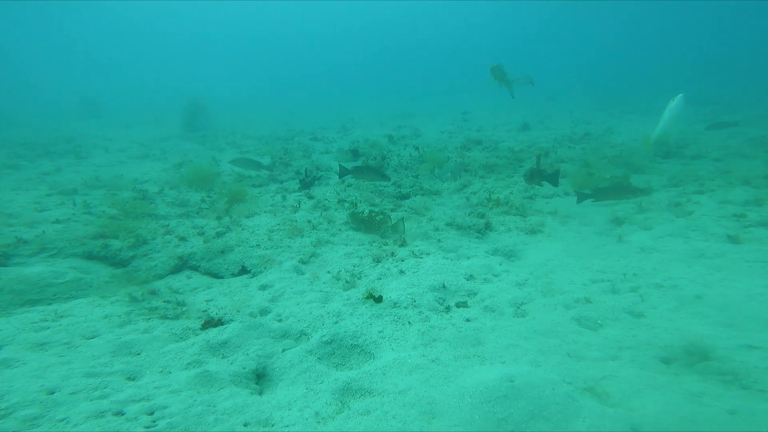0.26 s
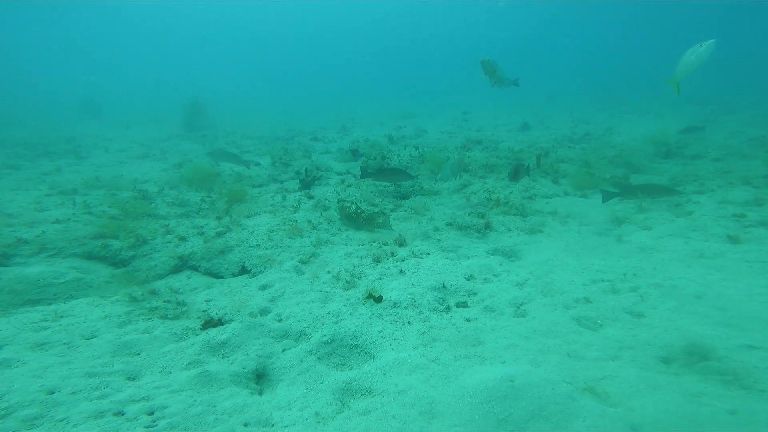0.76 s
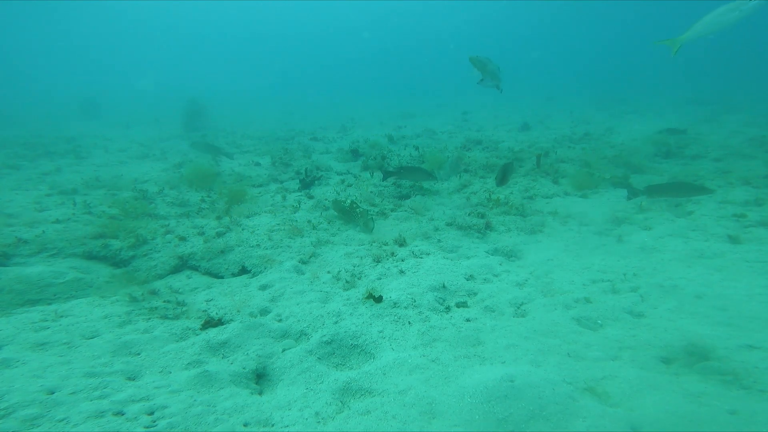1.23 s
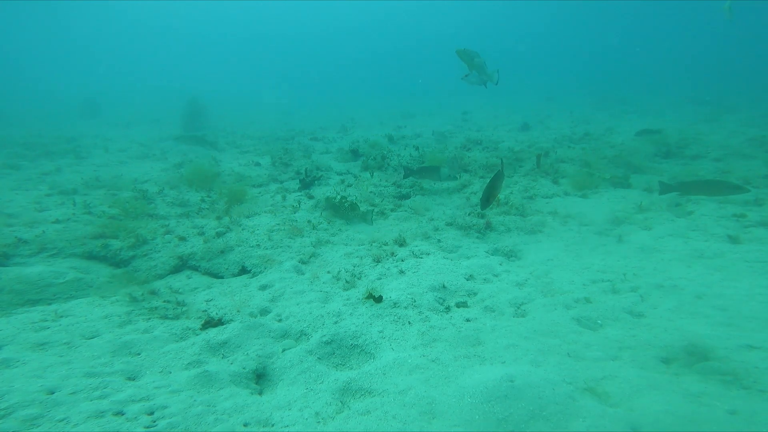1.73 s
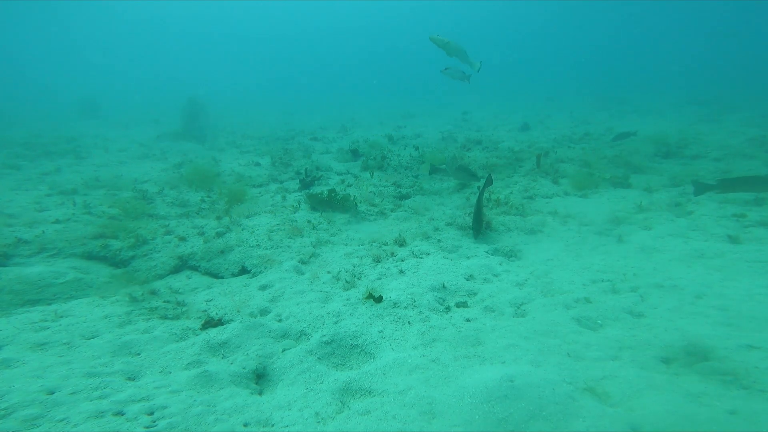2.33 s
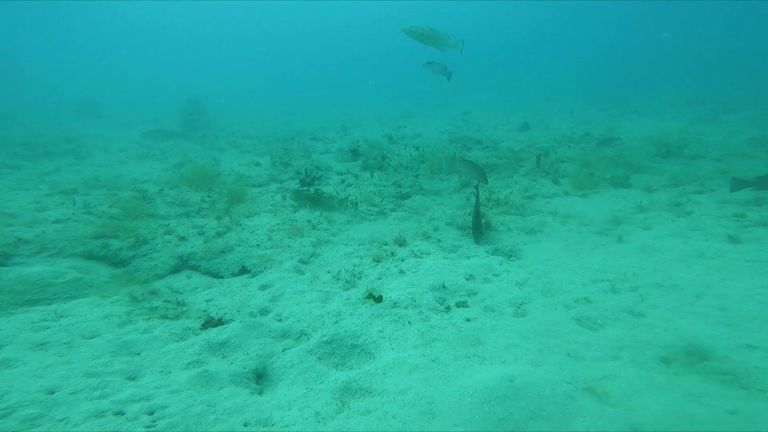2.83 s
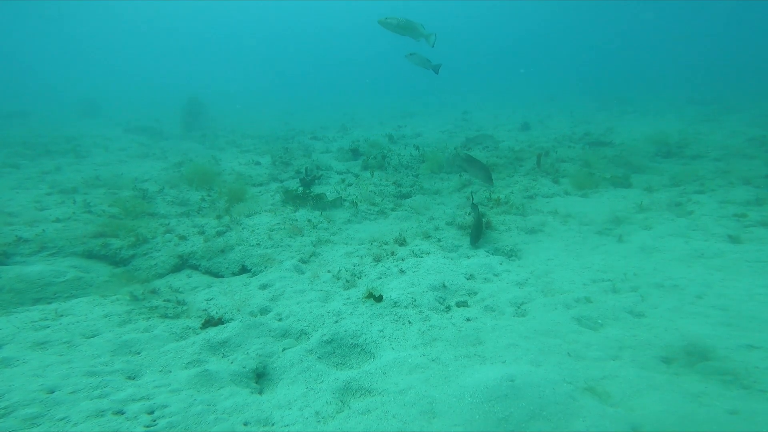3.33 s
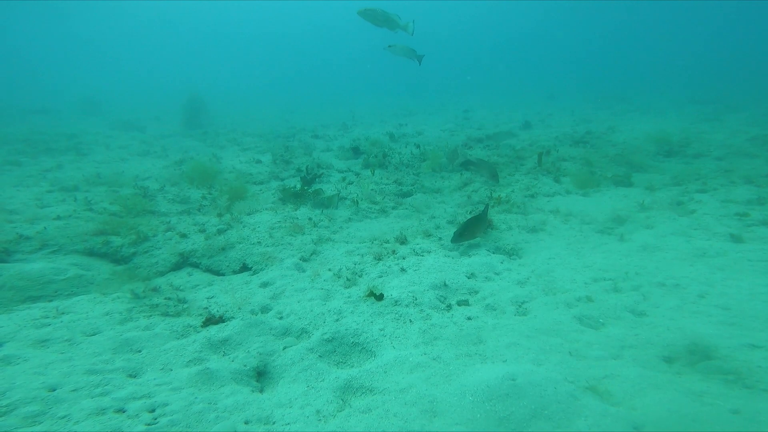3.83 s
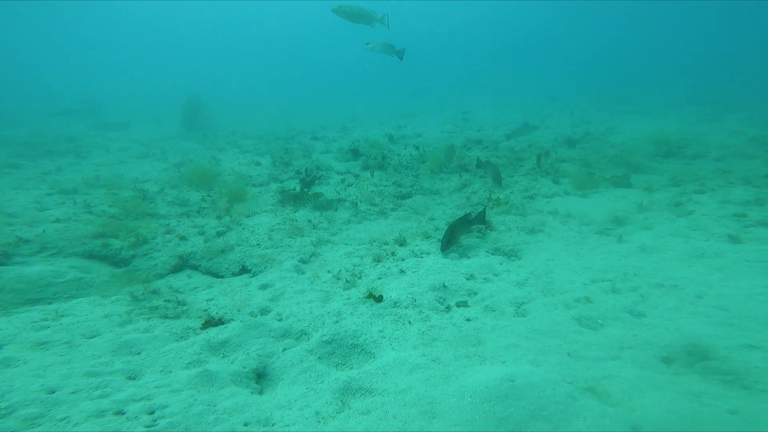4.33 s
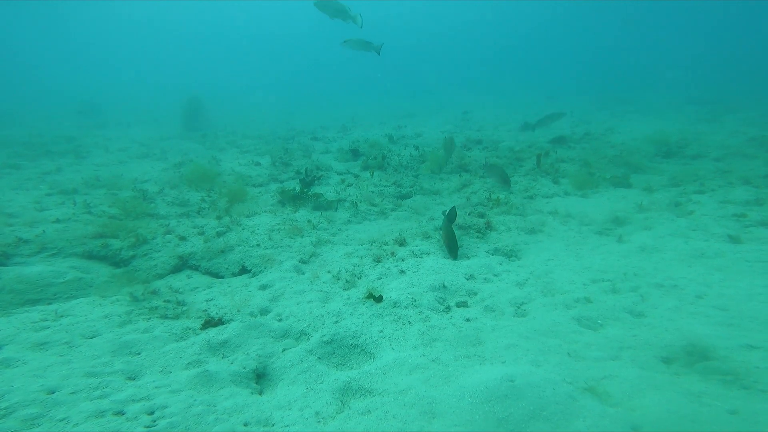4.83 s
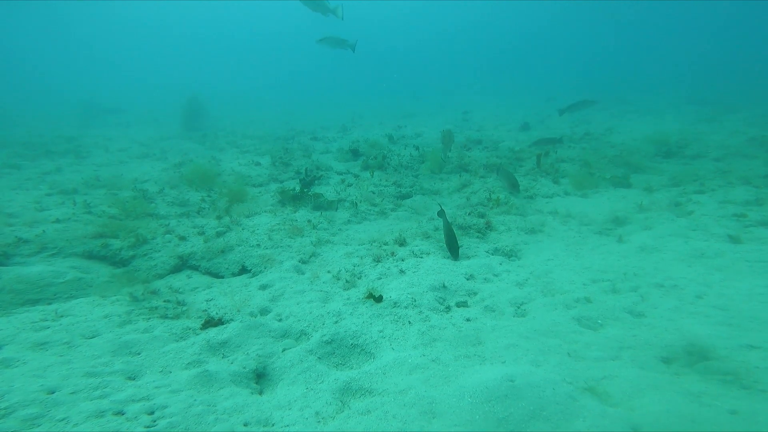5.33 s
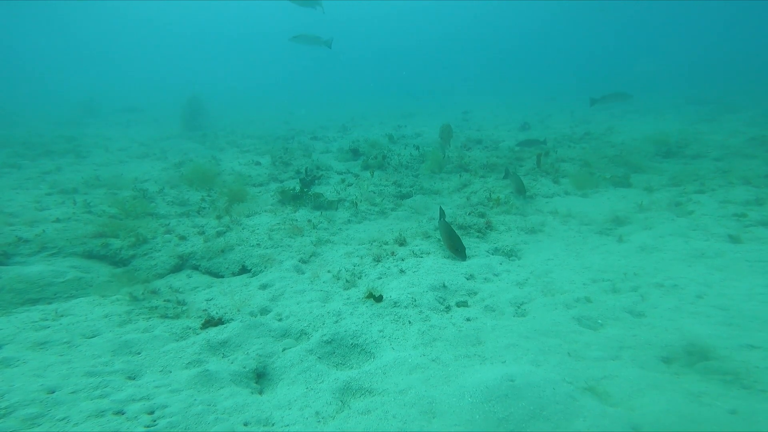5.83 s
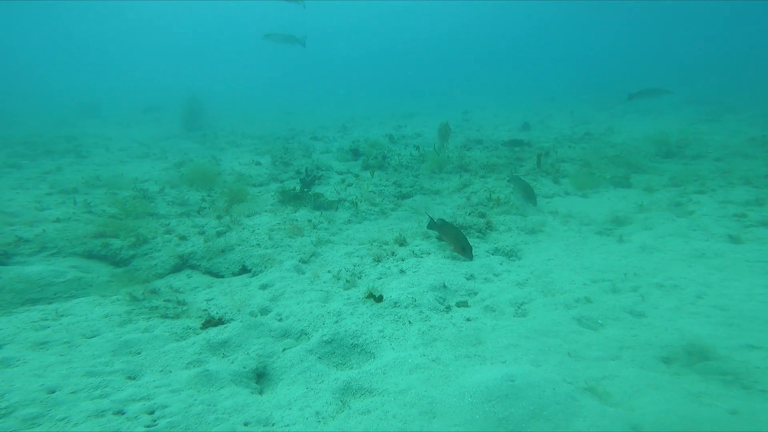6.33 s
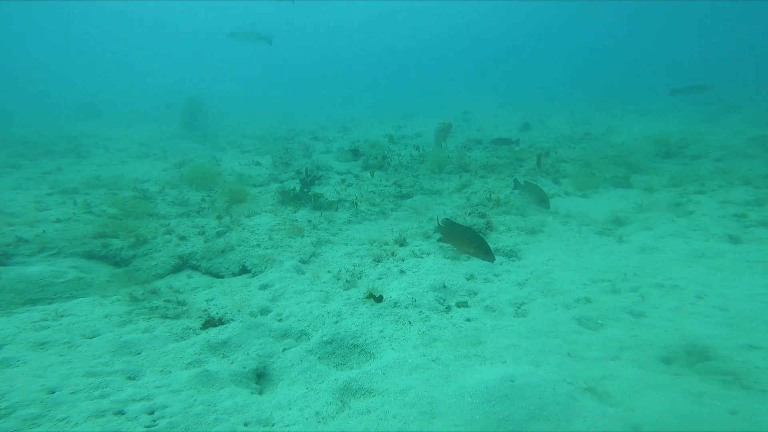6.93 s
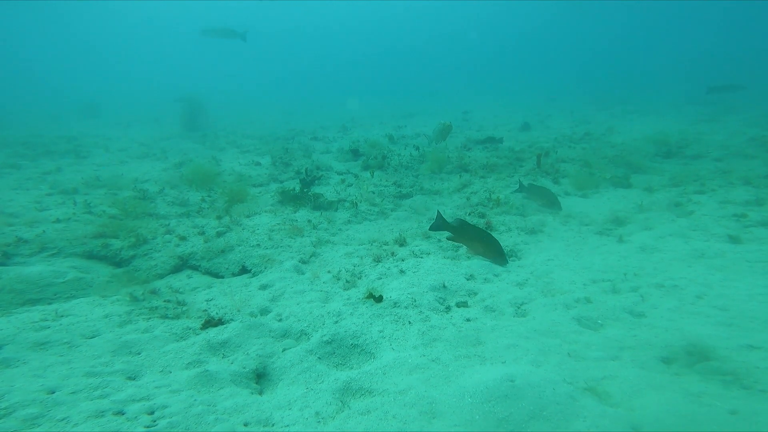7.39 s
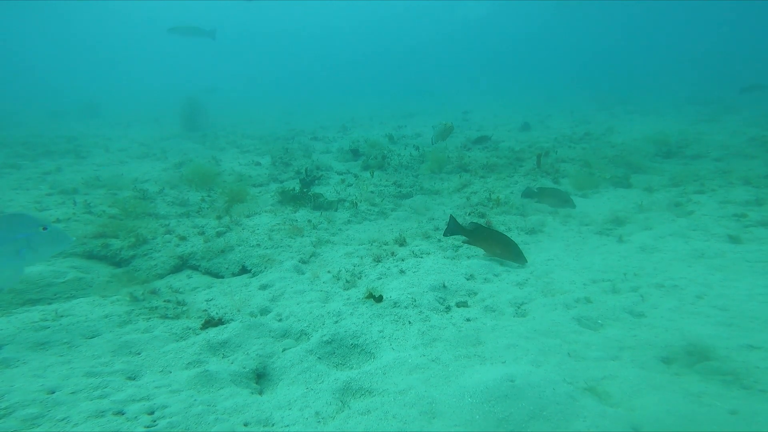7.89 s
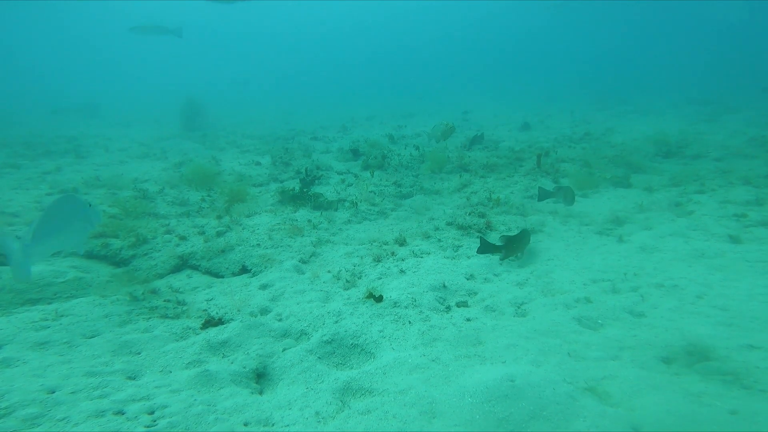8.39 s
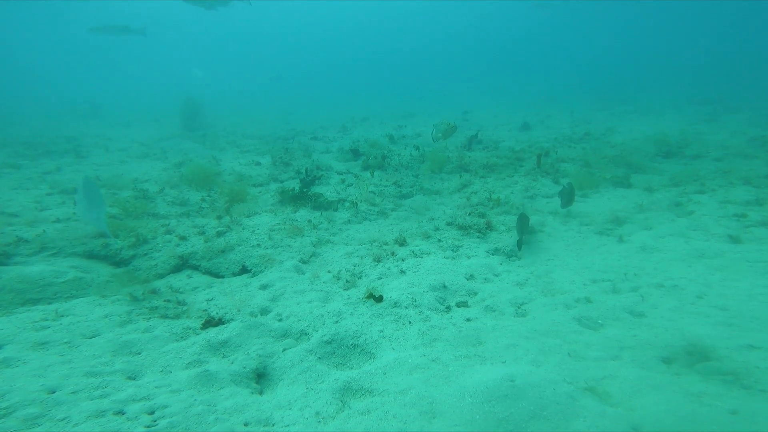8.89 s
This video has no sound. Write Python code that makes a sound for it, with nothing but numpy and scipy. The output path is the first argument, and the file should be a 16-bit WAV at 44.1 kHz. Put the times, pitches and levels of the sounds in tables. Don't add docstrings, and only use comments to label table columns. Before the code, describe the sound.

On a sandy seabed, a sealed camera casing is bumped in irregular bursts, rattling and shuddering while shrimp click sharply near and far.

```python
import sys
import numpy as np
from scipy import signal
from scipy.fft import rfft, irfft, next_fast_len
from scipy.io import wavfile
from scipy.ndimage import uniform_filter1d

SR = 44100
rng = np.random.default_rng(int(sys.argv[2]) if len(sys.argv) > 2 else 0)


def convert_level_to_amplitude(level_db):
    exponent = np.asarray(level_db, float) / 20
    return 10 ** exponent


def wav_record(signal):
    frames = np.transpose(np.atleast_2d(signal))
    bounded = np.clip(frames, -1, 1)
    quanta = np.round(bounded * 32767).astype(np.int16)
    wavfile.write(sys.argv[1], SR, quanta)


N = 403515

# (frequency [Hz], level [dB], t60 [s])
MAIN = [(562, 0, .046), (605, -12, .03), (518, -8, .034)]
LOW = [(254.8, 0.11, 0.056), (389, 0.89, 0.054)]
MIDDLE = [(912, 2, .032), (972, -1, .034), (1110, -6, .015), (1250, 1.5, .038), (1404, -2.5, .032),
          (1520, -8, .015)]
HIGH = [(1676, 5, 0.032), (1705, -0.5, 0.027), (1922, 3, 0.041), (2130, -9.5, 0.0085)]
TOP = [(2560, -9, .022), (2868, 0, .035), (3400, -5, .016), (3900, -9, .008), (4900, -16, .015),
       (5320, -10, .018)]
FAMILIES = [MAIN, LOW, MIDDLE, HIGH, TOP]
# (time [s], main mode peak [dB], low modes [dB], middle modes [dB])
BLOWS = [(0.39, -36.5, -39, 2.5), (0.894, -35, -8, -8), (2.177, -32, 3, 4), (2.378, -24, -9.5, -3),
         (2.42, -20, -17, -3.5), (2.911, -24.5, -14, -6.5), (3.093, -37, -36, 3), (3.145, -27.5, 0.5, -13),
         (3.282, -26, -10.5, -15), (3.688, -38.5, -7.5, -5.5), (4.811, -32, -20, 6),
         (4.832, -16, -19.5, -8.5), (4.991, -45, -21, 13.5), (5.016, -29, -30, 4), (5.247, -28.5, -7.5, -5),
         (5.552, -25, -4, 7), (5.594, -25, -12, 6), (5.785, -21, -2, -4.5), (5.875, -22.5, -40, -3),
         (7.638, -20, -10, -0.3), (8.26, -37, -20, 2.5)]
# (time [s], main mode peak [dB], low modes [dB], middle modes [dB], high modes
# [dB])
STRIKES = [(2.962, -14, -5, -11, -8), (3.154, -12, -5.5, 0.5, -6), (3.168, -24.5, 0, -1, -14),
           (3.210, -13, -4, 3, -6.5), (3.213, -23.5, 1, 5, -1.5), (3.228, -40.5, -0.5, 3, -6),
           (5.040, -17.5, -32, -9, -6), (5.047, -17, -31, -9, -9), (5.635, -17, -19, 6, 7),
           (5.6448, -20, -16.5, -7, -16), (8.081, -23.5, -0.5, 5, 1.5), (8.093, -29.5, -8.5, 4.5, -0.5),
           (8.196, -24.5, -10.5, -4.5, -16.5), (8.202, -10.5, -18.5, -10, -13),
           (8.2118, -22, -19, -5.5, -15), (8.369, -12.5, -17.5, -4, -8), (8.376, -11, -12, -10.5, -20),
           (8.3865, -17, -8, -1, -18), (8.3935, -29, -1, -6, -19)]


def knocks():
    # (time [s], main mode peak [dB], low modes [dB], middle modes [dB])
    bumps = [(0.026, -63, -4, 16.5), (1.25, -44, -4.5, -4), (1.391, -36, -3.5, -22),
             (2.547, -30.5, -23, -2.5), (2.834, -48, 16, 8), (3.459, -36.5, 8.5, -7.5),
             (3.542, -24, -4.5, -15), (4.708, -38.5, 5, -3), (4.786, -28, -32, -7.5),
             (5.064, -21.5, -20, -27), (5.461, -23.5, -12.5, -5.5), (5.664, -22.5, -6, -2),
             (5.909, -31, -21, -2), (5.99, -14.5, -5.5, -15), (6.139, -39, -20, -10.5),
             (6.243, -45.5, -9, -4), (6.403, -39, -5.5, -13), (6.448, -25.5, -3.5, -18),
             (7.063, -35, 0, -7), (7.239, -27, -7.5, -37), (7.435, -16.5, -9, -18.5),
             (8.013, -44.5, 10.5, 3), (8.438, -31.5, 3.5, -7.5), (8.471, -38.5, 1, -28),
             (8.509, -36.5, 3.5, -32), (8.776, -39.5, -9, -5.5)]
    # (time [s], main mode peak [dB], low modes [dB], middle modes [dB])
    ticks = [(0.626, -47, 9, -11), (1.127, -44.5, -7, -16), (2.3, -59, 7, 16), (2.523, -34, 1, -12),
             (2.61, -51, 13.5, -1), (3.013, -21.5, -14.5, -17.5), (2.874, -46, -2.5, 1.5),
             (3.056, -36, -39, -1), (3.384, -37.5, -17, -9.5), (4.409, -37, -28, -29.5),
             (4.61, -40, -18, -15), (5.215, -46, 5.5, 6), (5.567, -30.5, 5, 3), (6.325, -40.5, -4, -35),
             (6.524, -59.5, -14, 9.5), (6.99, -60, -5, 8), (7.37, -37, -2.5, 3.5), (7.601, -50.5, 22.5, 12),
             (7.782, -50, 6, 0.5), (8.541, -37, -16, -14), (8.753, -57.5, -24, 3.5)]
    # (time [s], main mode peak [dB], low
    # modes [dB], middle modes [dB], high modes [dB])
    thuds = [(4.421, -8, -15.5, -15.5, -19), (4.498, -13, -11.5, -11, -16), (6.856, -6.5, -19.5, -22, -22),
             (6.863, -17.5, -24, -12.5, -18), (7.073, -8.5, -21, -21, -25.5),
             (7.080, -19.5, -20.5, -14, -21), (4.883, -29, -17, -10, -22), (4.928, -26, -22, -17, -11),
             (4.948, -28, -24, -14, -20), (5.176, -37.5, 0, -4, -2), (0.64, -51, 2, -15, -20),
             (0.93, -47.5, -2, 3, -3), (1.761, -59.5, -1, 10, 9), (5.771, -35.5, -6.5, 8, -6),
             (5.819, -43.5, -9, 7, 5), (6.843, -38, -4, -20, -23), (5.062, -30.5, -19, -13, -12),
             (5.076, -31, -19, -17, -9), (4.428, -21, -11.5, -11.5, -17), (4.771, -37.5, -12, 0, -10),
             (4.845, -29, -10.5, 0.5, -9.5), (5.584, -30.5, -8.5, 7, -1), (5.627, -31, -3, 8.5, -8),
             (2.848, -41.5, -1, 1, 3), (7.294, -55, -5, 0, 18), (5.054, -22, -25, -14, -16),
             (5.216, -52, 0, 0, 14), (5.665, -40, -5, 6, 8)]
    # (time [s], peak [dB])
    chinks = [(2.421, -38.5), (2.962, -42.5), (3.154, -23.5), (3.212, -32), (5.037, -35.5), (5.559, -38),
              (5.593, -35.5), (5.636, -34), (6.857, -56), (4.422, -42), (7.074, -49.5), (7.372, -44),
              (7.634, -41), (8.082, -33.5), (8.096, -46), (8.201, -35.5), (8.369, -24), (8.384, -43),
              (3.222, -43), (3.058, -49), (3.096, -48), (8.264, -48)]

    def with_high(table, over_middle_db):
        return [(*row, row[-1] + over_middle_db) for row in table]

    # (events, top modes over high [dB], contact [ms], firmness of first contact)
    kinds = [(with_high(BLOWS, -8.5), -11.5, 9.5, 0.74),
             (with_high(bumps, -9.5), -21, 12.5, 0.63),
             (with_high(ticks, 3.5), -17.5, 9.4, 0.86),
             (STRIKES, -20, 8.97, 1.24),
             (thuds, -14, 5, 1.33)]
    touches = [(s, [db, db + low, db + mid, db + high, db + high + top_db], ms, firm)
               for table, top_db, ms, firm in kinds for s, db, low, mid, high in table]
    touches += [(s, [None] * 4 + [db], 7, 0.73) for s, db in chinks]
    main_firm = 1.9
    out = np.zeros(N)
    for s, levels_db, ms, firm in touches:
        u = np.linspace(0, 1, int(ms * SR / 1000))
        chatter = rng.standard_normal(len(u)) ** 3 * (u + 0.014) ** 0.29 * (1 - u) ** 0.5
        push = np.zeros(len(u))
        push[int(0.1 * len(u))] = firm * np.linalg.norm(chatter)
        for modes, db in zip(FAMILIES, levels_db):
            if db is None:
                continue
            force = chatter + push * (main_firm if modes is MAIN else 1)
            sound = signal.fftconvolve(force, ring(modes, rng.standard_normal((len(modes), 2))))
            add(out, s - 0.0016, convert_level_to_amplitude(db) * sound / abs(sound).max())
    return out


def rub():
    # (time [s], duration [s], dull level [dB], bright over dull [dB])
    scrapes = [(0.4, 0.066, -59, 4.5), (0.88, 0.076, -69.5, 4.5), (1.27, 0.1, -69, 0),
               (2.2, 0.2, -79.5, 20), (2.423, .13, -44, -2.5), (2.899, 0.061, -48, 1),
               (2.968, 0.019, -46, -17), (3.16, 0.027, -51.5, -12), (3.41, 0.13, -60, 5.5),
               (4.45, 0.3, -63.5, 0.5), (4.798, 0.25, -46, 0.5), (5.12, 0.16, -52, 1.5),
               (5.42, 0.25, -51.5, -0.5), (5.598, 0.017, -36.5, 0), (5.72, 0.24, -54.5, 2.5),
               (5.88, 0.19, -56.5, -10), (6.4, 0.04, -66, 6), (6.78, 0.12, -73.5, 19),
               (7.479, 0.17, -63, 11.5), (7.619, 0.04, -44, -1), (7.72, 0.075, -49, -2),
               (8.029, 0.12, -54, -4), (8.219, 0.13, -51, -9.5), (0.5, 0.12, -67.5, -3),
               (1.42, 0.13, -67, -3), (2.82, .04, -56, 1), (3.02, .09, -53.5, -4), (3.6, 0.11, -61, -4),
               (5.555, .03, -41, -2), (5.665, 0.024, -43.5, 0), (8.4, 0.12, -52.5, -6.5)]
    s, hold, db, over_db = np.transpose(scrapes)
    dull_db = swell(s, hold, db, rise=246.5, sag=0, stop=167, rest_db=-82)
    bright_db = swell(s, hold, db + over_db, rise=246.5, sag=0, stop=167, rest_db=-92)
    colour_db, grains_per_s = [3.5, 1.5, -3.5, -7, -19.5], 3500
    out = np.zeros(N)
    for modes, db, level_db in zip(FAMILIES, colour_db, [dull_db] * 2 + [bright_db] * 3):
        clump = evened(smooth_twice(rng.standard_normal(N), 600))
        grit = clicks(grains_per_s * np.exp(0.3 * clump), 2.8) * convert_level_to_amplitude(2.1 * clump)
        ringing = signal.oaconvolve(grit, ring(modes, np.zeros((len(modes), 2))))[:N]
        out += convert_level_to_amplitude(db + level_db) * evened(ringing)
    return out


def mount():
    # (time [s], swinging on [s], level [dB])
    sways = [(0.032, .55, -45), (0.97, 0.083, -49), (1.27, 0.028, -46.5), (1.41, 0.27, -46),
             (2.2, 0.12, -46.5), (2.55, 0.44, -35), (2.97, 0.086, -28.5), (3.2, 0.29, -26),
             (3.58, 0.19, -30), (3.85, 0.32, -28), (4.33, 0.055, -47.5), (4.49, 0.22, -26.5),
             (4.85, 0.45, -30.5), (5.2, 0.46, -37.5), (5.6, 0.44, -30), (6.02, 0.28, -33),
             (6.46, 0.28, -39.5), (6.85, 0.064, -46), (7.08, 0.058, -42.5), (7.3, 0.12, -40),
             (7.48, 0.25, -30.5), (7.99, 0.16, -38.5), (8.2, 0.14, -32.5), (8.46, 0.2, -31.5),
             (8.98, 0.027, -51), (9.11, 0.055, -49)]
    # (time [s], quick wobble [dB], rocking [dB])
    jolts = [(0.44, -56, -82), (0.92, -67, -63), (1.12, -54.5, -75), (1.29, -55, -49.5), (1.44, -50, -53),
             (2.21, -60, -53), (2.432, -32.5, -42), (2.56, -42.5, -45), (2.86, -40, -38),
             (2.977, -33.5, -32), (3.198, -30, -35), (3.433, -40.5, -39.5), (3.57, -36, -41),
             (4.48, -42, -43), (4.63, -67, -53), (4.858, -34, -42), (5.03, -39.5, -36), (5.197, -37, -41),
             (5.47, -36, -38.5), (5.6, -30, -30), (5.8, -42.5, -33.5), (6.008, -44.5, -37.5),
             (6.46, -42.5, -43), (6.879, -45.5, -42), (7.09, -48, -40), (7.458, -40, -45.5),
             (7.66, -36, -40), (8.08, -38.5, -37), (8.21, -45, -38.5), (8.39, -36.5, -35)]
    sway_hz, wobble_hz, rock_hz = 31.2, 130, 70.6
    sway_db = swell(*np.transpose(sways), rise=351, sag=22, stop=116.5, rest_db=-82)
    s, wobble_peak_db, rock_peak_db = np.transpose(jolts)

    def shaken(db):
        stops = np.repeat([188, 52], len(s))
        return swell(np.r_[s, s], 0.026, np.r_[db, db - 16], rise=387.5, sag=0, stop=stops, rest_db=-94.5)

    sway_noise, wobble_drift, wobble_noise, rock_noise = rng.standard_normal((4, N))
    drift = evened(smooth_twice(sway_noise, 5000))
    sway = evened(tone(sway_hz * (1 + 0.0316 * drift)))
    sway += 0.51 * evened(tremble(sway_noise, 1.08 * sway_hz, 13.6))
    drift = evened(uniform_filter1d(wobble_drift, 1500))
    wobble = evened(tone(wobble_hz * (1 + 0.0507 * drift)))
    wobble += 0.84 * evened(tremble(wobble_noise, wobble_hz, 42))
    rock = tremble(rock_noise, rock_hz, 64)
    out = convert_level_to_amplitude(sway_db) * evened(sway)
    out += convert_level_to_amplitude(shaken(wobble_peak_db)) * evened(wobble)
    return out + convert_level_to_amplitude(shaken(rock_peak_db)) * evened(rock)


def snaps():
    # (time [s], peak [dB], frequency [Hz])
    near_shrimp = [(0.5245, -26, 5670), (2.835, -29.5, 5530), (1.27, -30.5, 5040), (1.513, -32.5, 4000),
                   (2.2224, -32.5, 6170), (2.862, -35, 5110), (2.359, -30.5, 4210), (2.7821, -33.5, 8160),
                   (2.8098, -19.5, 2750), (2.9571, -29, 4930), (3.6029, -30, 4750), (4.1254, -32, 5360),
                   (4.2711, -37.5, 4730), (4.5369, -31, 5095), (4.6834, -26.5, 3060), (4.8532, -30, 3970),
                   (4.9237, -31.5, 7500), (5.003, -31, 4400), (5.35, -33, 7560), (5.441, -25, 4000),
                   (5.4935, -38, 7700), (6.1581, -37, 7600), (6.3813, -28.5, 5000), (6.5616, -28, 2960),
                   (6.5839, -27.5, 4170), (6.8918, -31, 5300), (6.93, -33, 3290), (7.8102, -22.5, 4300),
                   (8.1488, -34, 5100), (8.2895, -31.5, 4990), (0.7158, -35, 7800), (0.8614, -32.5, 5200),
                   (1.3848, -34, 4060), (1.9051, -34.5, 5940), (2.1455, -35, 5140), (2.2837, -30.5, 5240),
                   (3.1268, -36, 4050), (3.8457, -42, 5040), (4.2253, -42, 5900), (4.5037, -31.5, 2560),
                   (4.6633, -40, 5450), (5.0873, -35, 4900), (5.6146, -35, 4810), (6.124, -42, 5160),
                   (6.2282, -42, 4900), (6.6094, -38, 5100), (6.9805, -36.5, 5760), (7.4245, -45, 5050),
                   (7.7957, -42, 7310), (8.751, -46.5, 4060), (9.0274, -44, 5130), (7.321, -46.5, 7400),
                   (8.268, -42, 4500), (9.004, -35, 3070), (7.026, -35, 3100), (8.12, -39, 4200),
                   (2.542, -37, 7000), (6.78, -38, 7600)]
    cracks = [(s, db + mid - 21.5, 3060) for s, db, low, mid, *_ in [*BLOWS, *STRIKES]]
    out, t, taps = np.zeros(N), np.arange(500) / SR, wall(low_hz=2140)
    for s, db, hz in [*near_shrimp, *cracks]:
        click = rng.standard_normal(len(t)) * convert_level_to_amplitude(-60 * t / 0.009)
        click = evened(click) + 1.1 * evened(resonate(click, hz, 1100))
        crack = signal.fftconvolve(click, taps)
        add(out, s - 0.0004, convert_level_to_amplitude(db - 5.5) * crack / abs(crack).max())
    return out


def water():
    hiss_db, crackle_db, crackle_per_s = -59.5, -64, 260
    clump = evened(uniform_filter1d(rng.standard_normal(N), 2500))
    crackle = np.zeros(N)
    for hz in np.geomspace(2500, 12000, 6):
        tail = rng.standard_normal(500) * convert_level_to_amplitude(-60 * np.arange(500) / SR / 0.008)
        tail = evened(tail) + 1.7 * evened(resonate(tail, hz, 0.4 * hz))
        train = clicks(crackle_per_s / 6 * np.exp(0.4 * clump), 4.2)
        crackle += signal.oaconvolve(train, tail)[:N]
    hiss = rng.standard_normal((2, N)) * convert_level_to_amplitude(0.9 * clump)
    hiss = signal.oaconvolve(hiss, wall()[None])[:, :N]
    crackle = signal.oaconvolve(crackle, wall(low_hz=2300))[:N]
    return convert_level_to_amplitude(hiss_db) * hiss + other_path(convert_level_to_amplitude(crackle_db) * evened(crackle) + snaps())


def wall(low_hz=60):
    # (frequency [Hz], width [Hz], level over the water colour [dB])
    wall_peaks = [(970, 200, 8), (1333, 100, 10.5), (1692, 520, 17), (3110, 300, 8), (4070, 22, 7),
                  (4980, 96, 5), (5930, 73, 7.5), (7725, 500, 10.5)]
    # (frequency [Hz], level per Hz [dB])
    water_colour = [(90, -19), (170, 10.5), (300, 3.5), (720, -14), (2300, -15), (3600, -8.5), (5400, -5),
                    (6300, -11.5), (7400, -12), (8400, -17), (10500, -26.5), (12300, -27.5), (13500, -38),
                    (15500, -46)]
    hz = abs(np.fft.fftfreq(8192, 1 / SR))
    peaks_db = sum(db / (1 + (2 * (hz - f) / width) ** 2) for f, width, db in wall_peaks)
    gain = convert_level_to_amplitude(read(water_colour, hz)[0] + peaks_db) / (1 + (low_hz / (hz + 1)) ** 2)
    taps = np.fft.ifft(np.exp(np.conj(signal.hilbert(np.log(gain))))).real[:2048]
    return taps / np.linalg.norm(taps)


def other_path(x):
    r, c = 0.93, np.cos(2 * np.pi * np.geomspace(300, 12000, 9) / SR)
    allpasses = [[r * r, -2 * r * k, 1, 1, -2 * r * k, r * r] for k in c]
    drift = evened(uniform_filter1d(rng.standard_normal(N), 900))
    wander = np.sin(np.cumsum(drift) * 150 / SR)
    return np.array([x, signal.sosfilt(allpasses, x * evened(wander))])


def microphones(source, ports):
    size = next_fast_len(N + 2048)
    lean_db, same, lead = read(ports, np.fft.rfftfreq(size, 1 / SR))
    same = np.clip(same, 0, 1)
    left, other = rfft(source[0], size), rfft(source[1], size)
    right = same * np.exp(1j * lead) * left + np.sqrt(1 - same ** 2) * other
    lean = convert_level_to_amplitude(lean_db / 2)
    return irfft(np.array([left * lean, right / lean]), size)[:, :N]


def ring(modes, chance):
    t = np.arange(1700) / SR
    out = np.zeros(len(t))
    for (hz, db, t60), (stronger, sharper) in zip(modes, chance):
        sine = np.sin(2 * np.pi * hz * (1 + 0.012 * sharper) * t)
        soft_start = (1 - np.exp(-1.3 * hz * t)) ** 2
        out += convert_level_to_amplitude(db + 2 * stronger - 60 * t / t60) * sine * soft_start
    return out / abs(out).max()


def clicks(per_s, spread_db):
    size = convert_level_to_amplitude(spread_db * np.minimum(rng.exponential(1, N), 5)) * rng.choice([-1., 1.], N)
    return size * (rng.random(N) < per_s / SR)


def tone(hz):
    return np.sin(2 * np.pi * np.cumsum(hz) / SR)


def resonate(x, hz, width):
    turn = np.exp(2j * np.pi * np.cumsum(np.full(len(x), hz)) / SR)
    r = np.exp(-np.pi * width / SR)
    return 2 * (turn * signal.lfilter([1 - r], [1, -r], x / turn)).real


def tremble(noise, hz, width):
    return resonate(resonate(noise, hz, width), hz, width)


def swell(s, hold, db, rise, sag, stop, rest_db):
    t = np.arange(0, N / SR + 0.01, 0.004)[:, None]
    lost = rise * np.maximum(s - t, 0)
    lost = lost + sag * np.clip(t - s, 0, hold) + stop * np.maximum(t - s - hold, 0)
    power = (convert_level_to_amplitude(db - lost) ** 2).sum(1) + convert_level_to_amplitude(rest_db) ** 2
    return np.interp(np.arange(N) / SR, t[:, 0], 10 * np.log10(power))


def smooth_twice(x, size):
    return uniform_filter1d(uniform_filter1d(x, size), size)


def evened(x):
    return x / np.sqrt(np.mean(x ** 2) + 1e-20)


def read(points, hz):
    f, *columns = np.transpose(points)
    return [np.interp(np.log(hz + 1), np.log(f + 1), c) for c in columns]


def add(mix, s, sound):
    part = mix[round(s * SR):][:len(sound)]
    part += sound[:len(part)]


def scene():
    # (frequency [Hz], left minus right [dB], likeness [0-1], phase lead [rad])
    shell_ports = [(260, .5, .99, -.2), (560, 3.2, .99, -.5), (900, 1, .96, -.1), (1250, 4.5, .55, .2),
                   (1450, 1.6, .86, .1), (1700, 6, .95, 1.1), (2500, 2.7, .96, .9), (3400, 7, .8, .2)]
    water_ports = [(170, 0, .97, 0), (400, -3, .5, .3), (1300, -1, .75, .4), (1700, 4.5, .8, .3),
                   (3000, 4.5, .72, .8), (5000, 0, .96, 0), (6000, -1.5, .92, 0), (7000, 0, .66, .3),
                   (7800, 2, .95, .1), (11000, 3, .4, 0)]
    hollow_hz, hollow_width_hz = 661.7, 217
    hollow = signal.iirnotch(hollow_hz, hollow_hz / hollow_width_hz, SR)
    shell = signal.lfilter(*hollow, knocks() + rub())
    return mount() + microphones(other_path(shell), shell_ports) + microphones(water(), water_ports)


def band_limit(x):
    return signal.sosfilt(signal.butter(12, 15500, fs=SR, output="sos"), x)


def record(dry):
    return band_limit(dry)


dry = scene()
out = record(dry)
wav_record(out)
```